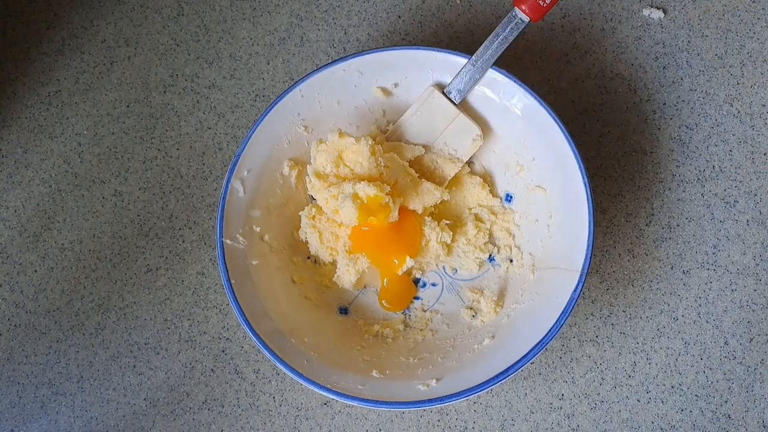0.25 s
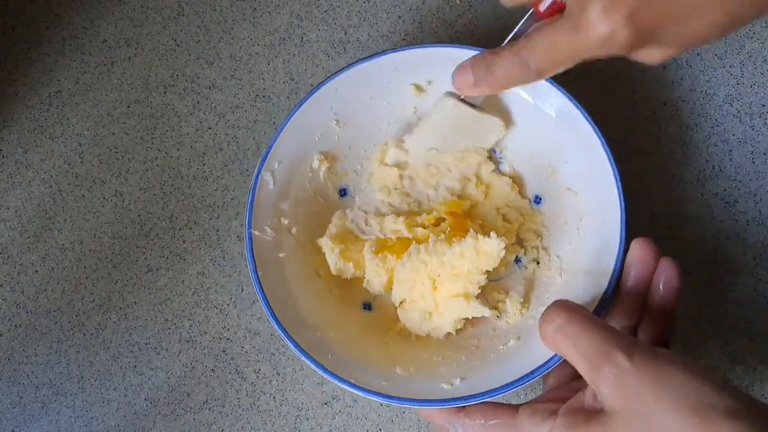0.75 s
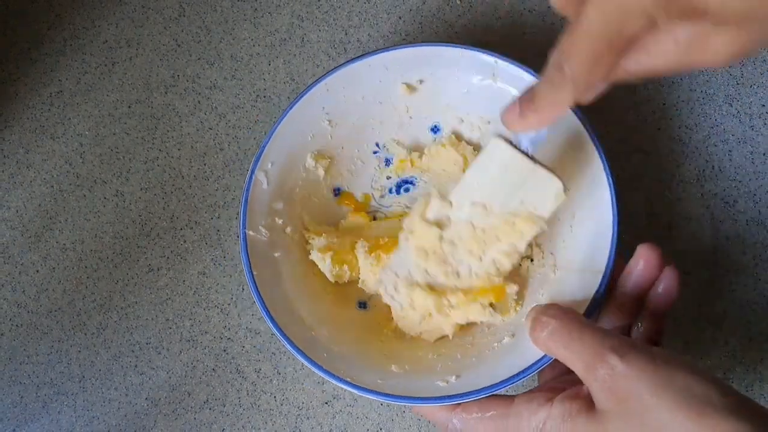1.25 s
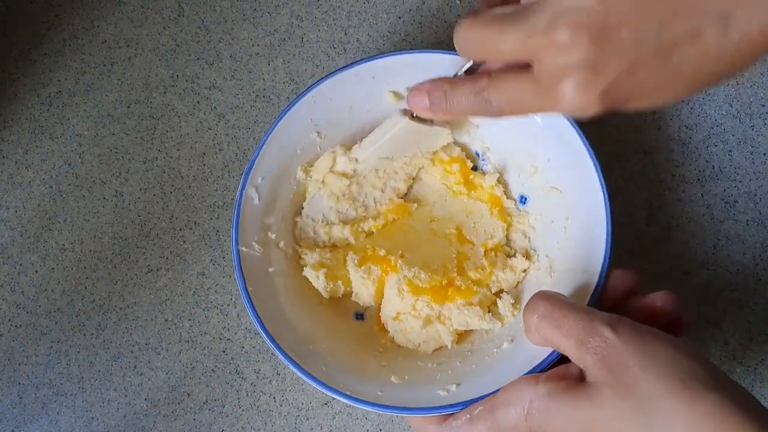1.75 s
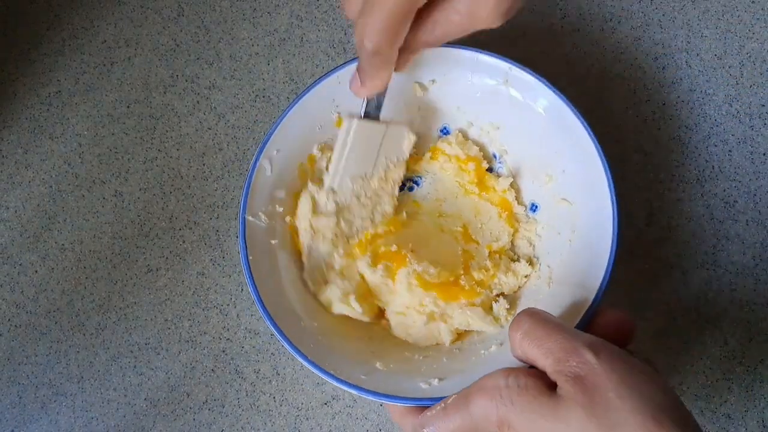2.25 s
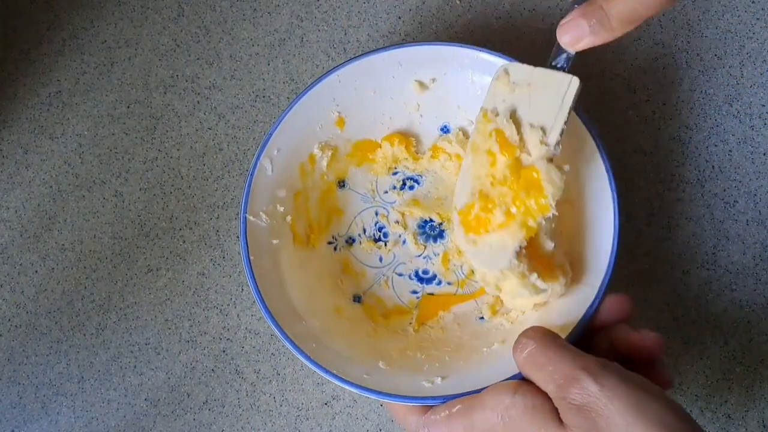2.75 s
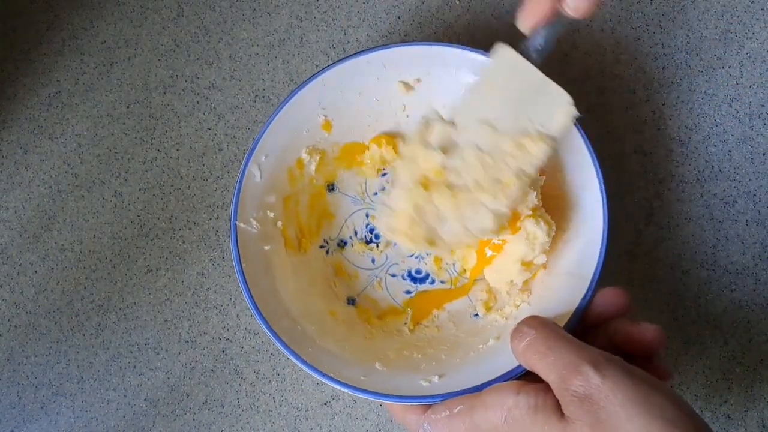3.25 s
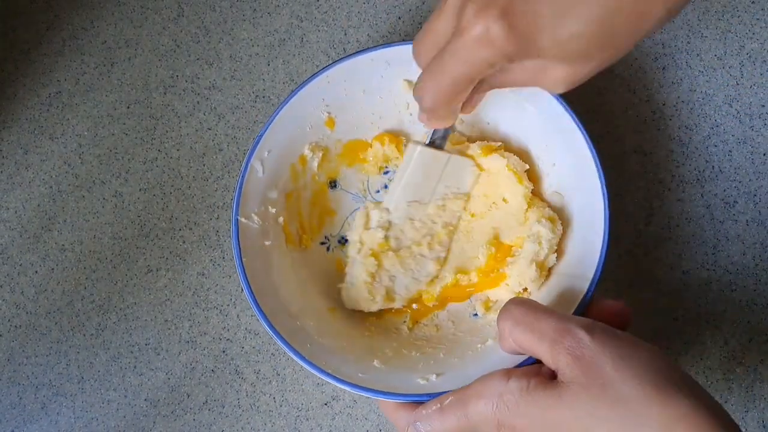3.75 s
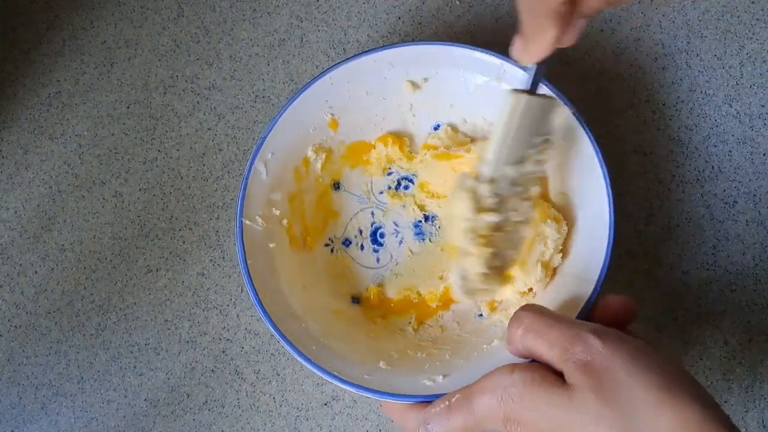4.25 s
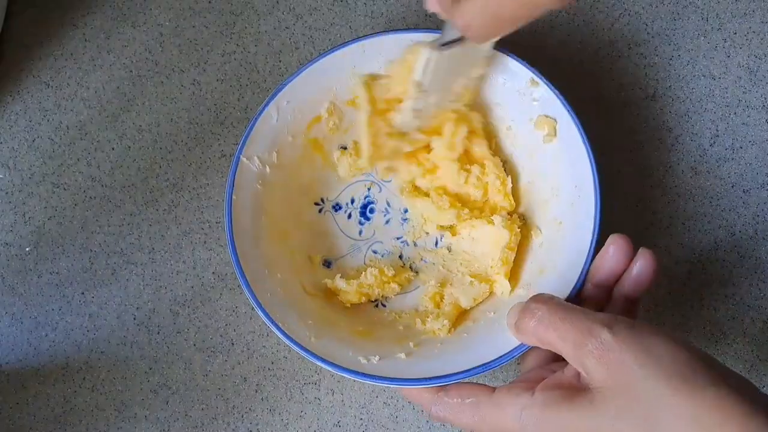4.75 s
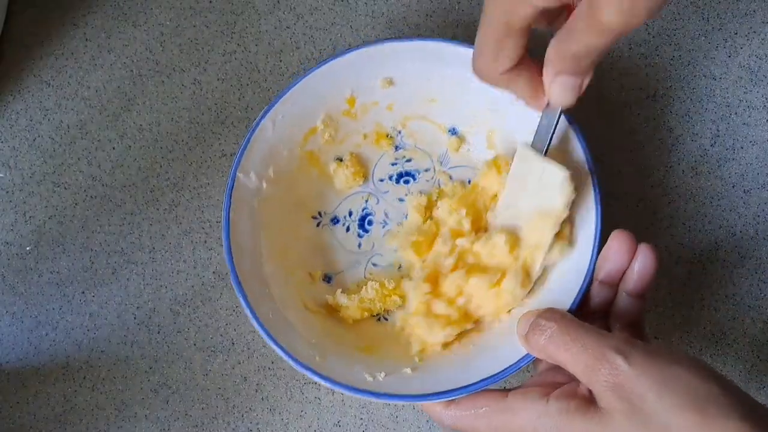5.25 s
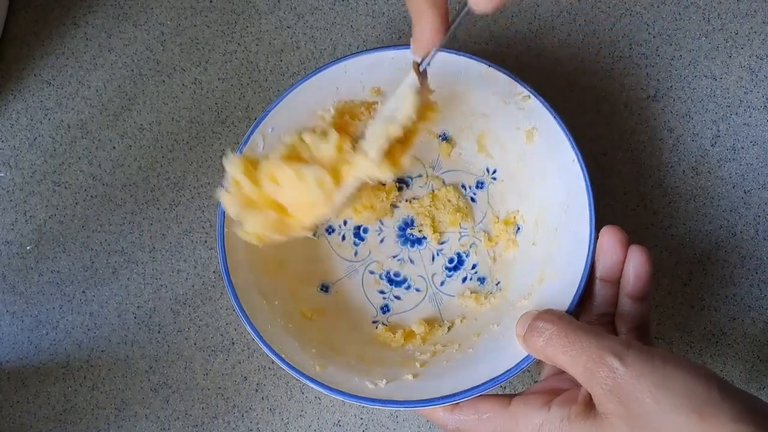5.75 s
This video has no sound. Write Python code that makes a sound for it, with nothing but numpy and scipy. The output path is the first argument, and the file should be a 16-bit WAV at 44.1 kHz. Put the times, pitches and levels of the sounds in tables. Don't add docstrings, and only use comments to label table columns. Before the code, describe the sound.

A close stereo pickup in a small, hard kitchen with quiet hush and faint hiss. For the first half second there is almost only a weak smear; at 0.6 the hands shift the bowl with low rumble and the spatula bites into sticky butter and yolk. Brief strokes follow, each a grainy, wet smear with crackle, fizz and sharp little pops; the blade rubs the glaze near 0.7 and 0.85 and squeaks very faintly at 0.93. Soft counter bumps and light knocks run to 1.75, with bright pops around 1.7-1.8. A firm, hand-damped ceramic tock lands at 2.15, then medium ones at 2.5, 3.0, 3.1, 3.4 and 4.04, between smears. At 4.56 the sound cuts abruptly to a brief lull. Very hard clacks strike at 4.73 and, loudest, 5.35, each just after a light touch, with short room tails. Thick smearing and popping continue to 6.0.

```python
import sys
import numpy as np
from scipy import signal
from scipy.fft import rfft, irfft, next_fast_len
from scipy.io import wavfile
from scipy.ndimage import uniform_filter1d, map_coordinates

SR = 44100
rng = np.random.default_rng(int(sys.argv[2]) if len(sys.argv) > 2 else 0)


def how_loud(loudness_db):
    steps = np.asarray(loudness_db, float) / 20
    return 10 ** steps


def wav_out(sig):
    wavfile.write(sys.argv[1], SR, np.round(np.clip(np.atleast_2d(sig).T, -1, 1) * 32767).astype(np.int16))


N = 264159

# f/Hz, level/dB, t60/s
BASE_MODES = [(503, -3, 0.059), (578, 2, 0.045), (651, -2, 0.042)]
# f/Hz, level/dB, t60/s
LOW_THUMP_MODES = [(234.9, -4, 0.2), (198.7, -15.5, 0.2)]
# f/Hz, level/dB, t60/s
HIGH_THUMP_MODES = [(308.8, 3.5, 0.095), (337, -7, 0.087)]
# f/Hz, left-right likeness
DIFFUSE_ALIKE = [(60, 0.94), (130, 0.79), (290, 0.98), (640, -0.14), (1410, -0.27), (3100, -0.072),
                 (6820, 0.44), (15000, -1.04)]
SCENE_CHANGE_S = 4.5585
POP_PAN_SCATTER_DB = 4


def unit(x):
    return x / np.sqrt(np.mean(x ** 2) + 1e-20)


def along(points, hz):
    f, v = np.transpose(points)
    return np.interp(np.log(hz + 1), np.log(f + 1), v)


def curves(rows):
    s, *cols = np.vstack(rows).T
    return [np.interp(np.arange(N) / SR, s, c) for c in cols]


def by_sample(x):
    return np.interp(np.arange(N) * 1000 / SR, np.arange(len(x)), x)


def wobble(rate):
    knots = rng.standard_normal(int(N * rate / SR) + 4)
    return map_coordinates(knots, [np.arange(N) * rate / SR])


def filtered(x, response):
    n = x.shape[-1]
    m = next_fast_len(n + 8192)
    return irfft(rfft(x, m) * response(np.fft.rfftfreq(m, 1 / SR)), m)[..., :n]


def spread(pair, gain, alike):
    turn = lambda hz: np.arccos(np.clip(along(alike, hz), -1, 1)) / 2
    mid, side = filtered(pair, lambda hz: gain(hz) * [np.cos(turn(hz)), np.sin(turn(hz))])
    return unit(np.array([mid + side, mid - side]))


def resonances(modes):
    return lambda f: sum((-1) ** k * how_loud(db) * 1j * f * width / (hz * hz - f * f + 1j * f * width)
                         for k, (hz, width, db) in enumerate(modes))


def ring(modes, t, attack, scatter_db):
    x = 0
    for hz, db, t60 in modes:
        decay = how_loud(db + rng.normal(0, scatter_db) - 60 * t / t60)
        x = x + decay * np.sin(2 * np.pi * hz * rng.normal(1, 0.021) * t)
    x = x * (1 - np.exp(-t / attack))
    return x / np.abs(x).max()


def burst(spectrum, t, t60):
    noise = filtered(rng.standard_normal(len(t)), lambda hz: how_loud(along(spectrum, hz)))
    x = noise * how_loud(-60 * t / t60) * (1 - np.exp(-t / 0.00025))
    return x / np.abs(x).max()


def air():
    # f/Hz, level/dB per Hz
    hush_spectrum = [(82, -36), (140, -6.5), (264, -11.5), (297, -4.5), (335, -42.5), (377, -6),
                     (607, -6.5), (670, -4.5), (740, -5.5), (1480, -12), (2160, -18), (3550, -22.5),
                     (14800, -30.5), (16000, -21.5)]
    hush = spread(rng.standard_normal((2, N)), lambda hz: how_loud(along(hush_spectrum, hz)), DIFFUSE_ALIKE)
    return how_loud(-59) * hush


def hands():
    # t/s, effort/dB
    grip = [(0.0, -56.5), (0.51, -59.5), (0.59, -41.5), (0.72, -54), (1.15, -51.5), (1.29, -59.5),
            (1.6, -47), (2.0, -54.5), (2.43, -48.5), (2.88, -57), (3.14, -47), (3.3, -58), (4.08, -50.5),
            (4.2, -61), (4.7, -52), (4.86, -46), (5.15, -53), (5.99, -51)]
    # f/Hz, level/dB per Hz
    rumble_spectrum = [(12, -54), (20, -31), (32, -18.5), (45, -13.5), (70, -5), (96, -10.5), (134, -22.5),
                       (190, -53), (250, -53), (420, -120)]
    still_s, still_db = 0.067, -10.5
    effort_db, = curves(grip)
    since = np.arange(N) / SR - SCENE_CHANGE_S
    still = how_loud(still_db * (since > 0) * np.clip(2 - since / still_s, 0, 1))
    noise = rng.standard_normal((2, 2, N))
    rumble = spread(noise[0], lambda hz: how_loud(along(rumble_spectrum, hz)), [(25, .65), (60, .86), (130, .97)])
    modes = [(hz, 6 / t60, db) for hz, db, t60 in LOW_THUMP_MODES + HIGH_THUMP_MODES + BASE_MODES]
    drag = spread(noise[1], resonances(modes), DIFFUSE_ALIKE)
    lumps_db = 1.2 * wobble(25) + 2.5 * wobble(9)
    drag_db = -60.5 + 0.84 * (effort_db - effort_db.mean()) + 3.1 * wobble(20)
    return still * (how_loud(effort_db + lumps_db) * rumble + how_loud(drag_db) * drag)


def squeak():
    # t/s, length/s, f/Hz, level/dB
    whistle = (.934, .02, 3270, -63)
    s, length, hz, db = whistle
    u = (np.arange(N) / SR - s) / length
    swell = how_loud(db + 4 * wobble(300)) * np.exp(-(2 * u - 1) ** 4)
    return swell * np.sin(2 * np.pi * hz * length * (u - .02 * u * u))


def pressure():
    # t/s, length/s, pressure/dB, change to the end/dB, wetness/dB
    passes = [(0.03, 0.36, -70.5, -4, -7), (0.588, 0.032, -57, -3.5, 5.5), (0.618, 0.082, -60, -1, -9),
              (0.752, 0.1, -71, 10.5, -0.5), (0.866, .22, -59, -0.5, 1), (1.313, .13, -70, -12.5, 13.5),
              (1.451, 0.26, -64.5, 2, 8), (1.685, 0.12, -53, -1.5, 0.1), (1.82, 0.14, -56, -10, -0.5),
              (2.165, 0.23, -58.5, 4.5, -2), (2.487, 0.031, -58, 0, -6), (2.414, 0.35, -62, -9.5, 4.5),
              (2.801, 0.24, -69.5, 3.5, 5.5), (3.015, 0.079, -56, 0, 3), (3.102, .1, -55.5, -18, -6),
              (3.377, .26, -59.5, -10, -3), (3.651, 0.29, -60, -1, 7.5), (3.863, 0.16, -60, 12, 0.5),
              (4.401, 0.15, -83, 18.5, 8.5), (4.775, 0.16, -55, -13, -0.5), (4.934, .38, -59, 0.9, 2),
              (5.37, .17, -49.5, -13.5, -1), (5.588, 0.21, -71.5, -18, 8.5), (5.896, .1, -58, -0.5, 2)]
    bite_db_per_s, lift_db_per_s = 900, 550
    peel_db, peel_db_per_s = -13.5, 112
    t = np.arange(0, N / SR, .001)
    s, length, db, change_db, wet_db = np.transpose(passes)[:, :, None]
    before = np.maximum(s - t, 0)
    after = np.maximum(t - s - length, 0)
    gain = how_loud(db + change_db * np.clip((t - s) / length, 0, 1) - bite_db_per_s * before)
    gain = gain * np.maximum(how_loud(-lift_db_per_s * after), how_loud(peel_db - peel_db_per_s * after))
    gain = gain * ((t < SCENE_CHANGE_S) | (s > SCENE_CHANGE_S))
    return by_sample(gain.max(axis=0)), by_sample((gain * how_loud(wet_db)).max(axis=0))


def ticks():
    count, length = 260, 128
    press = pressure()[0]
    even, normal = rng.random((count, 2)), rng.standard_normal((count, 2))
    at = (even[:, :1] * (N - length)).astype(int) + np.arange(length)
    t = np.arange(length) / SR
    hz = np.clip(6400 * 2 ** (0.65 * normal[:, :1]), 1500, 14500)
    size = press[at[:, :1]] * how_loud(8.5 - 3.5 * np.log(even[:, 1:]))
    snap = size * how_loud(-60 * t / 0.00096) * np.sin(2 * np.pi * hz * t)
    pan = how_loud(POP_PAN_SCATTER_DB * normal[:, 1:] / 2)
    return np.array([np.bincount(at.ravel(), (snap * side).ravel(), N) for side in (pan, 1 / pan)])


def pops():
    # t/s, peak level/dB, f/Hz
    pockets = [(0.586, -40, 7200), (1.015, -37.5, 12400), (1.0465, -28, 12000), (1.3074, -37, 12900),
               (1.072, -42.5, 1990), (1.49, -35, 13900), (1.5299, -35, 6740), (5.147, -29.5, 4460),
               (1.6775, -31, 11900), (1.6896, -38.5, 2310), (1.736, -28.5, 7750), (1.8058, -24, 7160),
               (2.2144, -40, 6900), (2.2588, -27, 1820), (2.4064, -33.5, 14600), (2.4833, -25, 6000),
               (5.0105, -32, 6000), (3.0644, -31, 6730), (3.661, -31, 6660), (3.683, -27, 8700),
               (3.8377, -29, 13900), (3.915, -27, 12400), (4.5223, -33.5, 9600), (5.001, -29, 6940),
               (5.1258, -29, 7000), (5.183, -31, 3470), (5.26, -30, 11500), (5.292, -32, 11300),
               (5.909, -34.5, 4430), (5.9824, -30, 6850)]
    t = np.arange(SR // 40) / SR
    out = np.zeros((2, N + SR))
    for s, db, hz in pockets:
        pan_db = rng.normal(-1.5, POP_PAN_SCATTER_DB)
        puff = rng.standard_normal((2, len(t))) * (how_loud(-60 * t / .0025) + how_loud(-15 - 60 * t / .025))
        pocket = resonances([(hz, hz / 1.1, 0)])
        puff = filtered(puff, lambda f: pocket(f) ** 2)
        level = how_loud(db + np.array([[pan_db], [-pan_db]]) / 2)
        out[:, round(s * SR):][:, :len(t)] += level * puff / np.abs(puff).max()
    return out[:, :N]


def crackle(rate, size_db, share):
    chance = rate / SR * how_loud(6 * wobble(60))
    grains = (rng.random(N) < chance) * how_loud(size_db * rng.exponential(1, N))
    swell = signal.lfilter([1], [1, -.93], grains)
    noise = rng.standard_normal((2, N)) * (1 + share * unit(swell))
    z = signal.stft(noise, nperseg=128)[2]
    patches = uniform_filter1d(rng.standard_normal(z.shape[1:]), size=9, axis=0)
    patches = uniform_filter1d(patches, size=4, axis=1)
    return signal.istft(z * how_loud(1.47 * unit(patches)), nperseg=128)[1][:, :N]


def contact():
    # t/s of firmest contact, lead-in/s, lift-off/s, level/dB
    touches_down = [
        (0.68, 0.044, .03, -52),
        (0.84, 0.033, 0.059, -49),
        (1.078, 0.03, .05, -67),
        (1.756, 0.04, .1, -56.5),
        (2.14, 0.071, .02, -53),
        (4.01, 0.078, 0.043, -60),
        (5.14, 0.023, 0.054, -59.5),
        (5.335, 0.012, .02, -52),
        (5.52, .05, .04, -62),
        (5.9, 0.032, .08, -62),
    ]
    t = np.arange(0, N / SR, .001)
    return by_sample(sum(how_loud(db - 10 * np.maximum((s - t) / lead, (t - s) / lift))
                         for s, lead, lift, db in touches_down))


def strokes():
    # f/Hz, level/dB per Hz
    smear_spectrum = [(880, -37), (1500, -0.5), (2550, -3), (3210, -2.5), (4010, -2.5), (5090, -8),
                      (10000, -10.5), (13000, -15.5), (22000, -120)]
    # f/Hz, level/dB per Hz
    fizz_spectrum = [(4410, -13), (7500, -7.5), (9190, -14), (14500, -4), (15700, -12), (16000, -39)]
    # f/Hz, width/Hz, level/dB
    glaze_modes = [(1233, 89, -2), (1515, 24, -6), (1620, 16, -2.5), (1822, 42, -4.5), (2234, 120, -13.5),
                   (2782, 40, -11.5)]
    smear_gain, fizz_gain = pressure()
    flutter = how_loud(1.8 * wobble(70) + .8 * wobble(18))
    paste = crackle(300, size_db=2.6, share=.36)
    smear = spread(paste, lambda hz: how_loud(along(smear_spectrum, hz)), [(3000, 0.069)])
    fizz = spread(paste, lambda hz: how_loud(along([(2500, -58)] + fizz_spectrum, hz)), [(9000, 0.031)])
    rub = spread(crackle(120, size_db=5.0, share=0.2), resonances(glaze_modes), [(1200, 0.13)])
    rub_gain = (contact() + how_loud(-17) * smear_gain) * how_loud(2.5 * wobble(45))
    return flutter * (smear_gain * smear + fizz_gain * fizz) + rub_gain * rub


def room(x):
    # f/Hz, t60/s
    decay_times = [(300, 0.28), (1200, 0.23), (4000, 0.21), (12000, 0.16)]
    # f/Hz, left-right likeness
    echo_alike = [(200, 1), (500, 0.62), (1200, 0.13), (3000, 0.071)]
    hz, t, z = signal.stft(rng.standard_normal((2, len(x))), SR, nperseg=256)
    tail = signal.istft(z * how_loud(-60 * t / along(decay_times, hz)[:, None]), SR, nperseg=256)[1]
    tail = spread(tail, lambda f: f > 250, echo_alike) / np.sqrt(tail.shape[1])
    return signal.fftconvolve(np.pad(x, (130, 0))[None], tail, axes=1)[:, :len(x)]


def knocks():
    # t/s, peak level/dB, push into the counter/dB, rocking of the bowl foot/dB
    blows = [(0.795, -51, 6.5, 1), (1.149, -43, -7, -7), (1.432, -43, -6, -5.5), (1.552, -38, -2.5, 8),
             (1.739, -37, -10, -8), (2.151, -14, -22, -10), (2.533, -27, -17.5, -7),
             (3.018, -26.5, -25, -14), (3.124, -30, -17, -4.5), (3.385, -27, -17.5, -5),
             (3.412, -33, -16.5, 1), (3.619, -38, -1.5, -8.5), (3.771, -38, -12.5, -0.5),
             (4.037, -28.5, -18.5, -9), (4.432, -47, -0.5, 8.5), (4.545, -42, -8, 4),
             (4.727, -8.5, -37, -7), (4.732, -20, -5, -1), (5.347, -5, -28, -20), (5.352, -16, -12, -6.5)]
    # t/s, peak level/dB
    first_touches = [
        (4.7219, -30),
        (5.3435, -25.5),
    ]
    # f/Hz, level/dB, t60/s
    boom_modes = [(112.4, -20, 0.32), (78.5, -20, 0.05)]
    # f/Hz, level/dB, t60/s
    wall_modes = [(850, -25, 0.015), (990, -1.5, 0.017), (1182, 3.5, 0.024), (1303, 4.5, 0.019),
                  (1530, 1, 0.0085), (1725, -2.5, 0.0092), (2050, -10, 0.0051), (2480, -19, 0.023),
                  (3230, -22, 0.012)]
    # f/Hz, level/dB per Hz
    clack_spectrum = [(500, -28), (900, -3), (1500, -1.5), (2600, -11), (4500, -19), (7000, -59)]
    # f/Hz, level/dB per Hz
    edge_spectrum = [(1290, -30), (2200, 1), (4940, -18), (6260, -9.5), (7930, -26), (15500, -25.5)]
    lead_s = .0001
    t = np.arange(SR // 3) / SR
    out = np.zeros((2, N + SR))
    for s, db, boom_db, rock_db in blows:
        base_db = -2 - 0.26 * (db + 31) + 0.29 * rock_db
        tock = ring(wall_modes, t, 0.00062, scatter_db=0.0)
        bright = clack_spectrum[:3] + [(hz, level + .5 * db + 4) for hz, level in clack_spectrum[3:]]
        clack = how_loud(-8.5) * burst(bright, t, 0.039)
        clack = clack + how_loud(-6.5 + .5 * db) * burst(edge_spectrum, t, 0.0057)
        base = how_loud(base_db) * np.array([ring(BASE_MODES, t, 0.0021, scatter_db=4.5),
                                        ring(BASE_MODES, t, 0.0065, scatter_db=1.0)])
        thump = how_loud(boom_db - 2) * ring(LOW_THUMP_MODES, t, .003, scatter_db=1.2)
        thump = thump + how_loud(rock_db) * ring(HIGH_THUMP_MODES, t, .0035, scatter_db=1.3)
        boom = how_loud(boom_db) * ring(boom_modes, t, .004, scatter_db=1.2)
        direct = (tock + clack) * how_loud([[1.5], [-1.5]]) + (base + thump) * how_loud([[-1.1], [1.1]]) + boom
        direct = filtered(direct, lambda hz: np.exp(1j * np.pi * hz * lead_s * np.array([[1], [-1]])))
        to_room = tock * how_loud(-60 * t / 0.022) + how_loud(-1.5) * clack + how_loud(-2) * base[0] + how_loud(-15.0) * thump
        heard = (s + t < SCENE_CHANGE_S) | (s > SCENE_CHANGE_S)
        out[:, round(s * SR):][:, :len(t)] += how_loud(db) * heard * (direct + how_loud(-1.0) * room(to_room))
    for s, db in first_touches:
        tap = ring(BASE_MODES + wall_modes, t, 0.00088, scatter_db=0.0)
        scuff = how_loud(-8 - 60 * t / 0.061) * rng.standard_normal((2, len(t)))
        out[:, round(s * SR):][:, :len(t)] += how_loud(db) * (tap + scuff)
    return out[:, :N]


def scene():
    return air() + hands() + squeak() + ticks() + pops() + strokes() + knocks()


def band_limit(x):
    return signal.sosfilt(signal.butter(12, 16500, fs=SR, output="sos"), x)


def record(dry):
    mix = filtered(dry, lambda hz: hz < 15650)
    return band_limit(mix)


dry = scene()
out = record(dry)
wav_out(out)
```